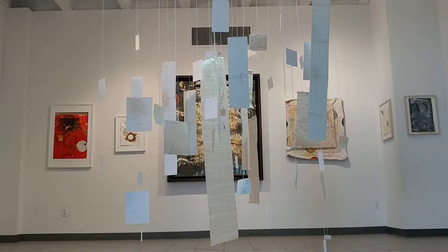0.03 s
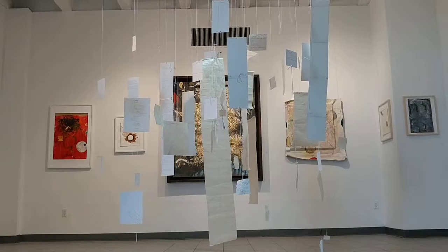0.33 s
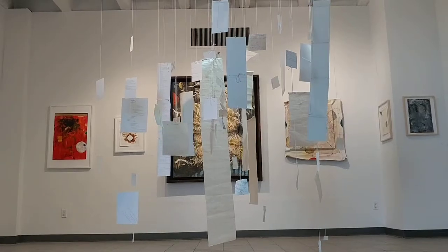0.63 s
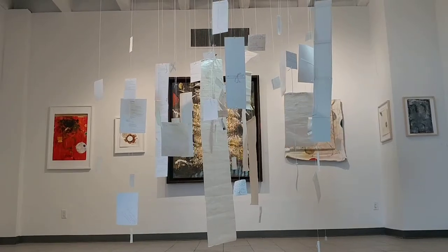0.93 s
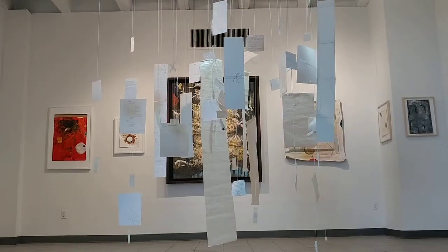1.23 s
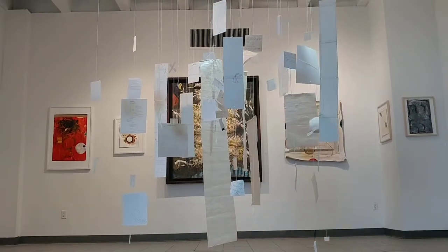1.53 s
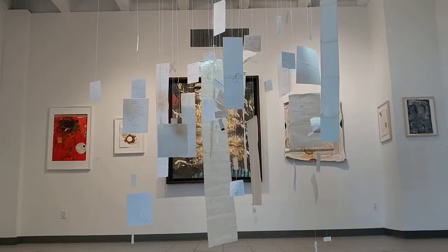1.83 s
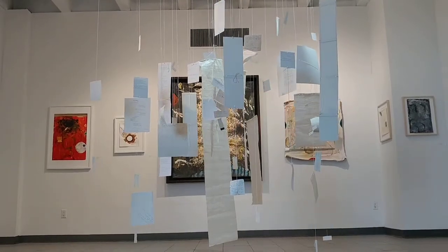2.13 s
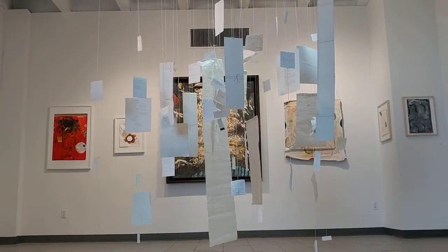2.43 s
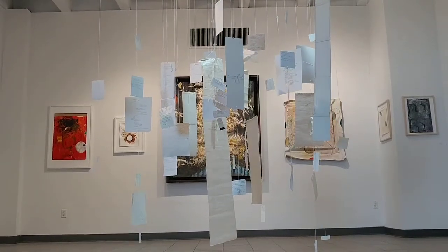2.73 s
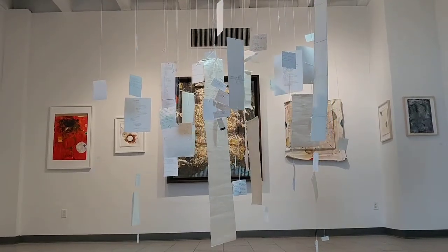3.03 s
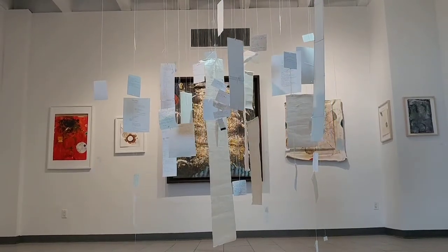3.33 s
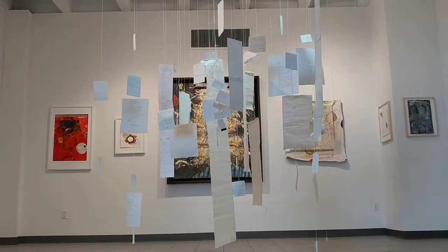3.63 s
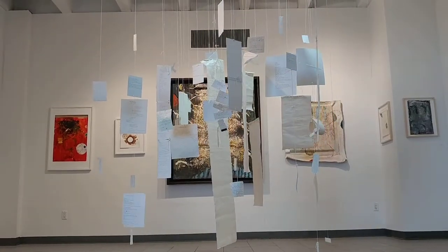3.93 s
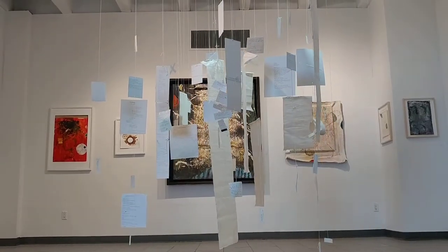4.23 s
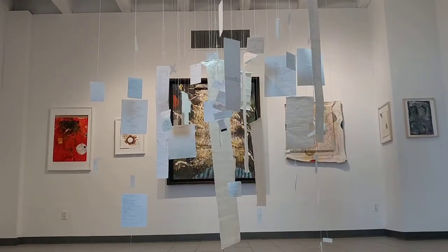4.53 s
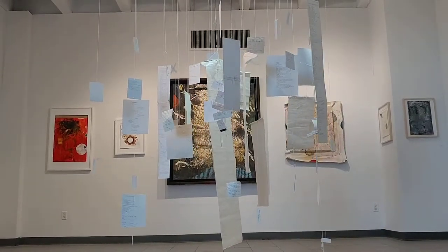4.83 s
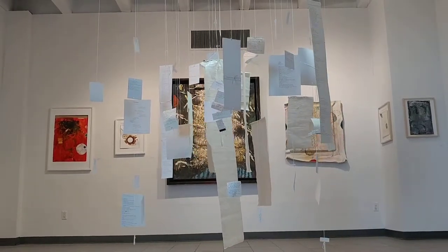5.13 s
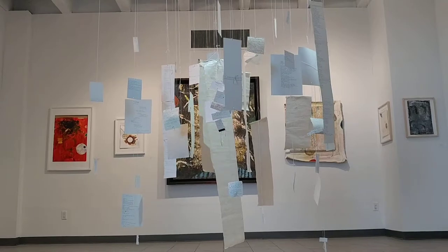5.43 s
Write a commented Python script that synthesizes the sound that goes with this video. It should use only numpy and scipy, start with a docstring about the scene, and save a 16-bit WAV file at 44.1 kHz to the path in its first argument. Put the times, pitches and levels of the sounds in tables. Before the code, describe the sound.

At about 0.2 seconds the sound of ventilation in a quiet gallery room fades in quickly and runs to the end, soft throughout and louder on the left. A steady motor hum and a low duct rumble carry a deep, throbbing fan drone. The drone swells around 0.8 seconds, sinks between 2 and 2.7, returns at 2.8 and peaks near 4.7 before easing. Air rushes softly from a wall grille the whole time, with a faint, unsteady whistle that comes and goes. Around 3.3 seconds the air sighs once on the slats, briefly brighter and slightly ringing. At about 5.4 seconds there is one faint, very deep thud, like a slow push of air. Underneath, the microphones add a light, even hiss and a thin, high, sizzling whine, mostly on the left. The hum continues until about 5.7 seconds.

```python
"""Gallery ventilation

A fan drones and swells, motors hum, turbulence rumbles in the ducts, and air rushes from a wall grille
with a soft whistle and one sigh on the slats. Late on comes one faint, deep thud. The microphones add
hiss and a thin whine. The sound fades in after 0.2 s and is louder on the left."""
import sys
import numpy as np
from scipy.fft import rfft, irfft, next_fast_len
from scipy.io import wavfile
from scipy.ndimage import map_coordinates

SR = 44100
rng = np.random.default_rng(int(sys.argv[2]) if len(sys.argv) > 2 else 0)


def output_pcm(signal):
    """Save a mono or channel-first signal as 16-bit PCM at the path in sys.argv[1].

    Samples are clipped to [-1, 1] before scaling.
    """
    pcm = np.clip(np.atleast_2d(signal).T, -1, 1) * 32767
    wavfile.write(sys.argv[1], SR, np.round(pcm).astype(np.int16))


N = 250488
TIME_S = np.arange(N) / SR


def amp(db):
    """Decibels to gain."""
    return 10 ** (np.asarray(db) / 20)


def unit_rms(x):
    """Scale the mean of the channels to rms 1."""
    return x / np.sqrt(np.mean(np.atleast_2d(x).mean(axis=0) ** 2) + 1e-20)


def at_hz(table, hz):
    """Read (f, value) rows on a log frequency axis."""
    knots_hz, values = np.transpose(table)
    return np.interp(np.log(hz + 1), np.log(knots_hz + 1), values)


def envelope(table):
    """Read (t, value) rows at every sample."""
    return np.interp(TIME_S, *np.transpose(table))


def wobble(rate_hz):
    """Smooth random curve, rate_hz knots a second."""
    return map_coordinates(rng.standard_normal(256), [TIME_S * rate_hz], mode="wrap")


def filtered(x, response):
    """Apply the gain response(hz) by FFT."""
    size = next_fast_len(N + SR // 2)
    hz = np.fft.rfftfreq(size, 1 / SR)
    return irfft(rfft(x, size) * response(hz), size)[..., :N]


def spectrum(table):
    """Response through (f, level) rows."""
    return lambda hz: amp(at_hz(table, hz))


def resonances(modes):
    """Response of steep-sided peaks from (f, width, level) rows."""
    return lambda hz: sum(amp(db) / (1 + 2 * ((hz - peak_hz) / width_hz) ** 2)
                          for peak_hz, width_hz, db in modes)


def tone(hz, drift_rad, rate_hz):
    """Sine of rms 1 with wandering phase."""
    return np.sqrt(2) * np.sin(2 * np.pi * hz * TIME_S + drift_rad * wobble(rate_hz))


def mono_noise(response):
    """Coloured noise of rms 1."""
    return unit_rms(filtered(rng.standard_normal(N), response))


# Left channel over right: f/Hz, level/dB
LEFT_LEAD = [(60, 12.5), (170, 11.5), (300, 6.5), (500, 9), (900, 9.5), (1300, 6.5), (2000, 3), (5000, 3.5)]

def pan(hz):
    """Left and right gains, mean 1."""
    lead = amp(at_hz(LEFT_LEAD, np.atleast_1d(hz)))
    return 2 * np.array([lead, np.ones_like(lead)]) / (1 + lead)


# Likeness of the channels: f/Hz, correlation
COHERENCE = [(25, 0.11), (50, 0.93), (110, 0.86), (180, 0.67), (260, 0.55), (420, 0.52), (740, 0.3),
             (1000, 0.26), (1350, -0.24), (2200, 0.015)]

def room_noise(response):
    """Diffuse stereo noise: alike in the bass, unrelated in the treble."""
    def mid_side_gains(hz):
        angle_rad = np.arccos(np.clip(at_hz(COHERENCE, hz), -1, 1)) / 2
        return response(hz) * [np.cos(angle_rad), np.sin(angle_rad)]
    mid, side = filtered(rng.standard_normal((2, N)), mid_side_gains)
    return unit_rms(filtered(np.array([mid + side, mid - side]), pan))


# Self-noise spectra: f/Hz, relative level/dB
HISS_LEFT = [(300, -13), (2500, 2.5), (5000, 0), (7000, 1.5), (8500, -1), (9400, -6.5), (10400, -11.5),
             (11300, -9), (12300, -5), (16000, -7)]
HISS_RIGHT = [(300, -1), (2500, 2), (4000, 1), (6000, -0.5), (8000, -3), (10400, -5), (12300, -4),
              (16000, -3.5)]
# Sizzle and whine: t/s, relative level/dB
SIZZLE_LEVEL = [(.25, -77.5), (.4, -79), (.62, -82), (1.2, -84), (5.68, -83)]

def microphones(left_db=-71, right_db=-74.5, sizzle_hz=8050, width_hz=750, whine_hz=7745):
    """Each microphone hisses; a sizzling band with a thin whine sits on the left."""
    level_db = envelope(SIZZLE_LEVEL)
    sizzle = amp(level_db + 2) * mono_noise(resonances([(sizzle_hz, width_hz, 0)]))
    whine = amp(level_db - 0.5) * tone(whine_hz, drift_rad=0.84, rate_hz=33)
    left = amp(left_db) * mono_noise(spectrum(HISS_LEFT)) + sizzle + whine
    right = amp(right_db) * mono_noise(spectrum(HISS_RIGHT)) + amp(-19) * whine
    return np.array([left, right])


def thud(at_s=5.42, half_width_s=0.022, hz=32, gain_db=-46):
    """One slow push of air, faint and very deep."""
    t = TIME_S - at_s
    return pan(hz) * amp(gain_db) * np.exp(-(t / half_width_s) ** 2) * np.sin(2 * np.pi * hz * t)


# Machine tones: f/Hz, relative level/dB, level wander/dB, phase drift/rad
MOTOR_TONES = [(50.7, -55, 2.5, 0.22), (93.7, -57.5, 3.5, 0.97), (119.9, -48.5, -0.36, 0.1),
               (214.2, -63, 2.5, 0.88)]

def motors(gain_db=-4):
    """Mains hum holds nearly steady while the shaft tones waver."""
    hum = np.zeros((2, N))
    for hz, db, wander_db, drift_rad in MOTOR_TONES:
        hum += pan(hz) * amp(db + wander_db * wobble(2.95)) * tone(hz, drift_rad, rate_hz=5)
    return amp(gain_db) * hum


# Fan drone: t/s, relative level/dB
FAN_LEVEL = [(0.26, -56), (0.68, -51.5), (0.84, -38.5), (1.06, -44.5), (1.34, -44), (2.14, -52.0),
             (2.32, -45.5), (2.4, -48), (2.52, -50.5), (2.66, -53.5), (2.78, -40.5), (3.7, -40.5),
             (4.22, -43.5), (4.38, -39), (4.68, -36.5), (4.78, -46), (5.18, -47.0), (5.67, -41)]

def fan_swell_db(usual_db=-44):
    """Swing of the drone about its usual level."""
    return envelope(FAN_LEVEL) - usual_db


# Turbulence spectrum: f/Hz, relative level/dB
DUCT_RUMBLE = [(15, -27), (34, -28), (44, -16.5), (55, 1), (65, -4), (76, -5), (90, -17), (130, -21.5),
               (300, -39.5), (900, -100)]
# Duct and room resonances: f/Hz, width/Hz, relative level/dB
DUCT_MODES = [(94.2, 18.2, -2), (106.3, 5.2, -1), (175.8, 10.6, -3), (223.5, 16.5, -8)]

def ducts(rumble_db=-48.9, boom_db=-52, churn_db=2):
    """Turbulence rumbles and booms in the ducts, a little more as the fan swells."""
    swell_db = fan_swell_db()
    rumble = amp(rumble_db + 0.3 * swell_db + churn_db * wobble(8)) * room_noise(spectrum(DUCT_RUMBLE))
    boom = amp(boom_db + 0.33 * swell_db) * room_noise(resonances(DUCT_MODES))
    return rumble + boom


def whistle(level_db, hz=746, flutter_db=1.94, stray_db=2.3):
    """An unsteady jet whistles, coming and going."""
    unsteady_db = flutter_db * wobble(25) + stray_db * wobble(9)
    return pan(hz) * amp(level_db + unsteady_db) * tone(hz, drift_rad=1.15, rate_hz=34)


# Airflow: t/s, relative level/dB
FLOW_LEVEL = [(0.26, -56), (0.44, -55.5), (1.0, -57), (2.28, -58), (2.4, -60.5), (2.62, -58.5),
              (2.9, -60.5), (3.34, -57.0), (3.72, -60.0), (4.08, -57), (5.28, -58.5), (5.48, -60.0),
              (5.67, -58.0)]
# Spectra of air rush, slat edges and the sigh's fine hiss: f/Hz, relative level/dB
AIR_RUSH = [(30, -15), (100, 5.5), (150, 6), (250, 3.5), (310, 1), (385, 1.5), (460, -.5), (650, 0),
            (790, -4), (860, -7.5), (1050, -10), (1300, -22.5), (2000, -26.5), (2800, -26.5), (5000, -38),
            (12000, -49)]
SLAT_EDGE = [(500, -41), (850, 2), (1050, 1.5), (1380, -1), (1650, -4.5), (2000, -14), (4000, -33),
             (9000, -60)]
SIGH_HISS = [(1000, -20), (2600, 0), (4500, -3), (9000, -20)]
# Slat and cavity resonances: f/Hz, width/Hz, relative level/dB
SLAT_MODES = [(1296, 27, -2.5), (1394, 17, -3.5)]
CAVITY_MODES = [(387.7, 6.6, 1), (637, 19, -4.5), (735, 26, -1), (800.6, 12, -0.5)]

def grille(eddy_db=0.87, sigh_at_s=3.3, sigh_decay_s=0.22, sigh_rise_db=6.8):
    """Air rushes from the vent, sighs once on the slats, rings in their gaps and whistles."""
    flow_db = envelope(FLOW_LEVEL)
    gust_db = flow_db - flow_db.mean()
    sigh = np.exp(-np.abs(TIME_S - sigh_at_s) / sigh_decay_s)
    sigh_db = sigh_rise_db * sigh
    slat_db = -69.5 + 0.5 * gust_db
    jet_db = -69.5 + 1.4 * gust_db + 0.55 * sigh_db
    rush = amp(flow_db + 3 + eddy_db * wobble(12)) * room_noise(spectrum(AIR_RUSH))
    edge = amp(slat_db + sigh_db) * room_noise(spectrum(SLAT_EDGE))
    ring = amp(slat_db - 11.5 + 1.2 * sigh_db) * room_noise(resonances(SLAT_MODES))
    hiss = amp(-83) * sigh * room_noise(spectrum(SIGH_HISS))
    cavities = amp(flow_db - 10.2) * room_noise(resonances(CAVITY_MODES))
    return rush + edge + ring + hiss + cavities + whistle(jet_db)


def fan(low_hz=69, low_db=-45.4, throb_db=2.2, upper_hz=163.8, upper_db=-58, waver_db=3):
    """The low tone swells and throbs; the upper tone partly follows and wavers on its own."""
    swell_db = fan_swell_db()
    low_gain = amp(low_db + swell_db + throb_db * wobble(16))
    low = low_gain * tone(low_hz, drift_rad=0.5, rate_hz=7)
    upper_gain = amp(upper_db + 0.65 * swell_db + waver_db * wobble(9))
    upper = upper_gain * tone(upper_hz, drift_rad=0.6, rate_hz=5.5)
    return pan(low_hz) * low + pan(upper_hz) * upper


def scene():
    """Ventilation over microphone self-noise."""
    return fan() + motors() + ducts() + grille() + thud() + microphones()


# Fade-in gain: t/s, level/dB
FADE_IN = [(.211, -65), (.215, -11), (.22, -4.5), (.26, -2.5), (.34, 0), (.45, 1)]

def record(dry, cutoff_hz=15750):
    """Short fade-in, then a brick-wall low-pass."""
    return filtered(dry * amp(envelope(FADE_IN)), lambda hz: hz < cutoff_hz)


dry = scene()
out = record(dry)
output_pcm(out)
```